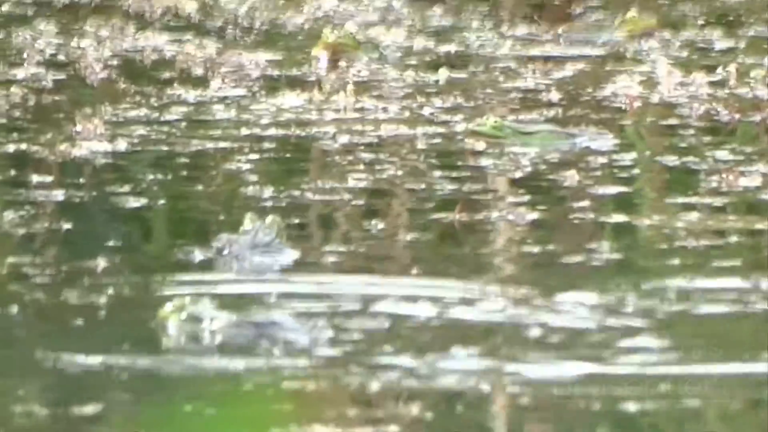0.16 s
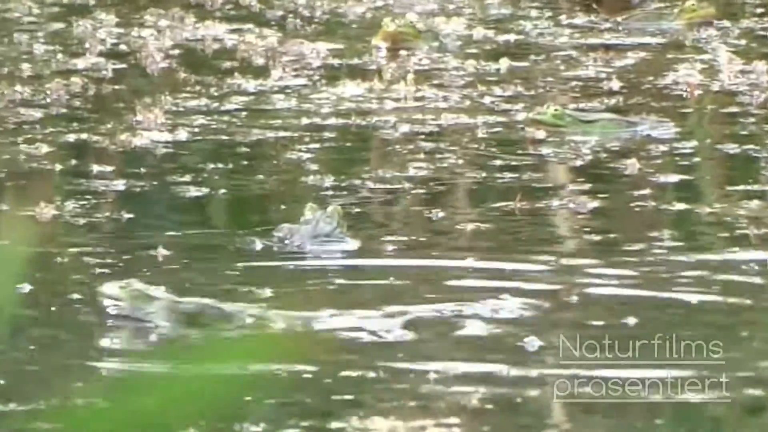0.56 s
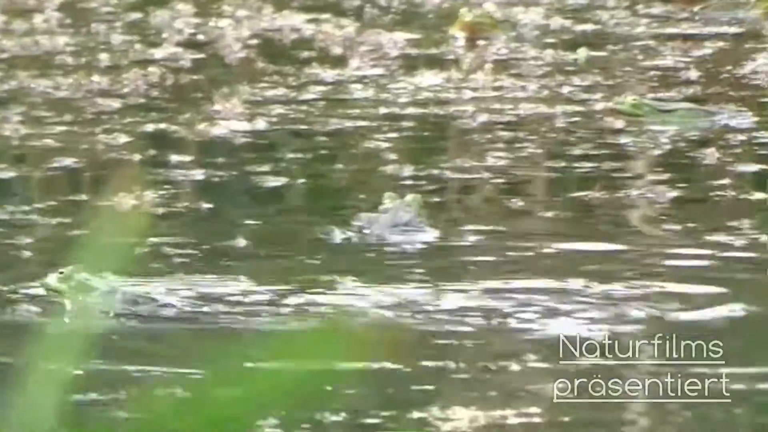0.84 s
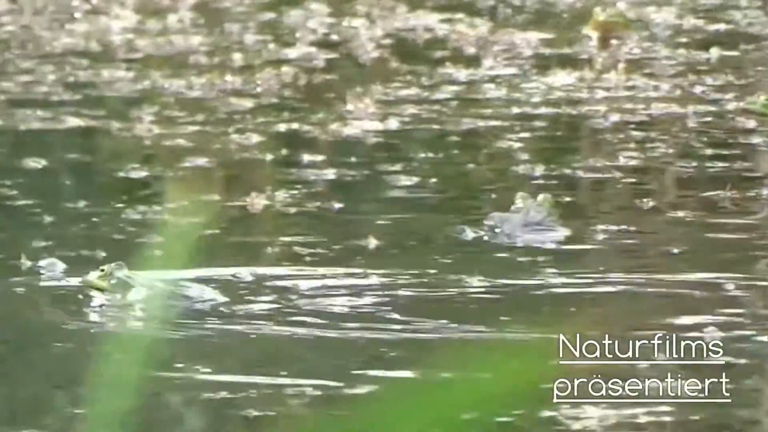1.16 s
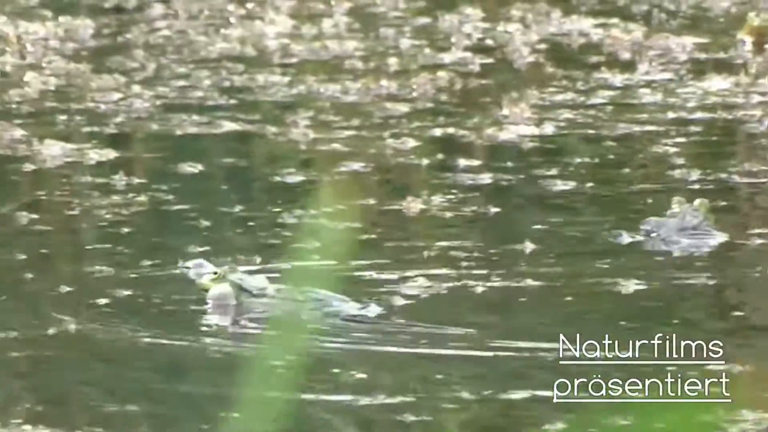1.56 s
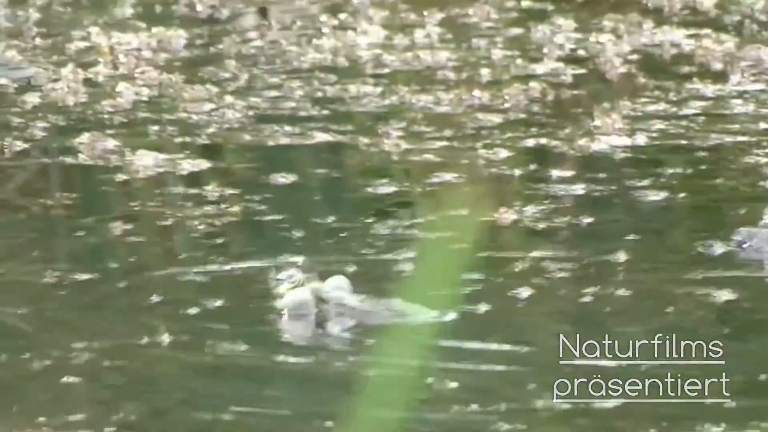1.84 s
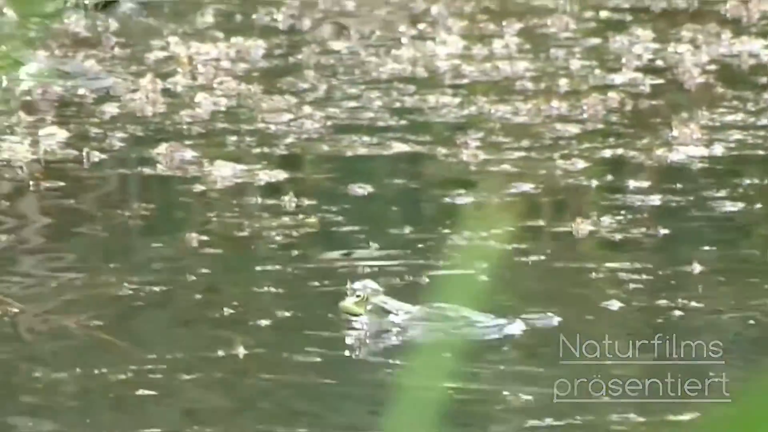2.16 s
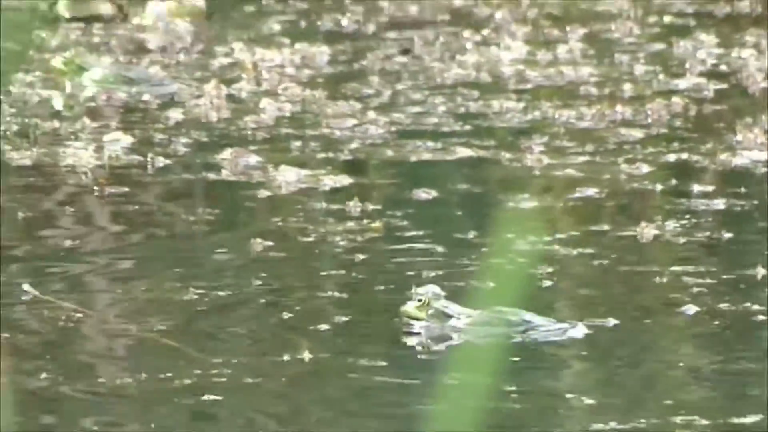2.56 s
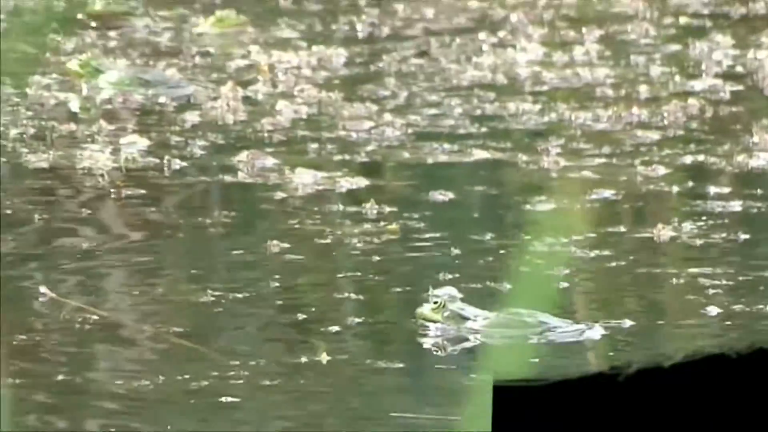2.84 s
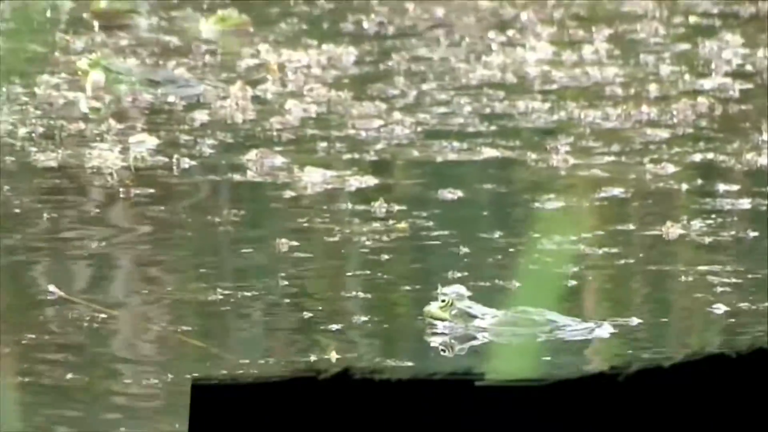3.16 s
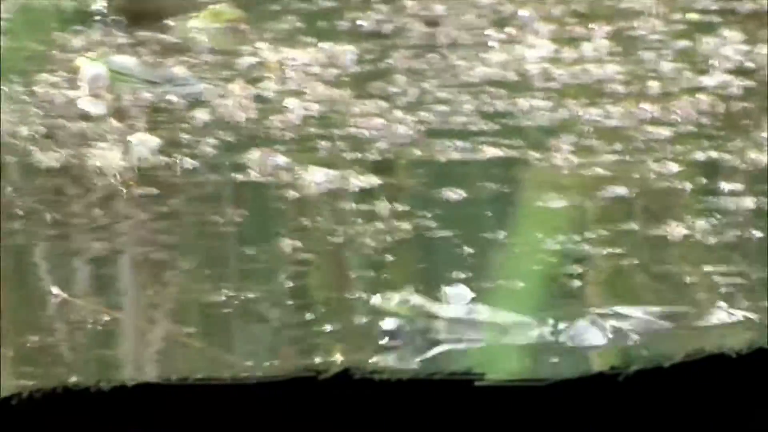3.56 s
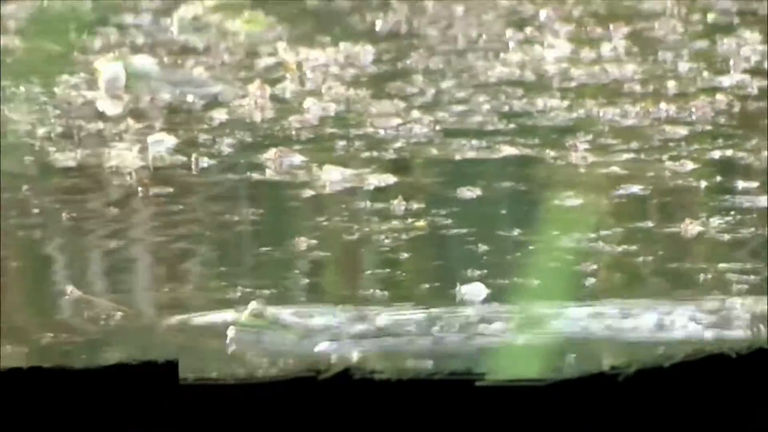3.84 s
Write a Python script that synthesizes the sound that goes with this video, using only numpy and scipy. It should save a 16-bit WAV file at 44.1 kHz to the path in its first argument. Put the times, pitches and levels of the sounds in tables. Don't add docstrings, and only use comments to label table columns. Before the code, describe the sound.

Frogs croak around a pond, after a quick fade-in. A dry, evenly knocking rattle runs 0.15-0.65 s, a swelling croak at 0.9, then grainy croaks at 1.7-2.6 with a brief rattle at 2.15. A pulsing laughing call grows from 3.0 to 3.65, another croak follows. Behind: faint trills, a buzz at 1.1, bird rasps at 1.7, 2.8 and 3.5, tiny whistles, clicks, airy hiss, low traffic hum.

```python
import sys
import numpy as np
from scipy import signal
from scipy.fft import rfft, irfft
from scipy.io import wavfile
from scipy.ndimage import uniform_filter1d

SR = 44100
rng = np.random.default_rng(int(sys.argv[2]) if len(sys.argv) > 2 else 0)


def gain_from_decibels(decibels):
    exponent = np.asarray(decibels, float) / 20
    return 10 ** exponent


def wrap_up_sound(samples):
    columns = np.atleast_2d(samples).T
    tamed = np.clip(columns, -1, 1)
    steps = np.round(tamed * 32767).astype(np.int16)
    wavfile.write(sys.argv[1], SR, steps)


N = 176400

# (start [s], length [s], peak place [0-1], peak level [dB])
CROAKS = [(0.129, 0.1, 0.07, -37), (1.683, 0.09, 0.97, -27), (2.821, 0.12, 0.88, -21),
          (3.429, 0.16, 0.75, -23.5), (3.285, 0.093, 0, -28), (2.36, 0.062, 1, -32.5)]
# (first sac pitch [Hz], last [Hz], first pulse gap [ms], last [ms], ring t60 [s])
CROAK_VOICES = [(1592, 1047, 5.1, 5.9, 0.06), (1346, 1260, 5, 6.5, 0.039), (1017, 1417, 5.1, 6.3, 0.02),
                (1380, 1274, 5.5, 7, 0.017), (1750, 1380, 12, 6.2, 0.024), (900, 1000, 5.5, 6, 0.014)]
# (time [s], peak level [dB])
EARLY_CROAKS = [
    [(0.8821, -31), (0.8873, -36.5), (0.8934, -32), (0.8999, -30), (0.9065, -29), (0.9151, -27),
     (0.9258, -28), (0.935, -24.5), (0.943, -26), (0.9521, -21.5), (0.9619, -24.5), (0.9697, -21.5),
     (0.9762, -21.5), (0.9828, -30), (0.9907, -29), (1.0008, -26.5), (1.0072, -33)],
    [(1.7761, -32), (1.7826, -30), (1.7892, -28), (1.7969, -24), (1.8055, -22), (1.8128, -22),
     (1.8204, -21.5), (1.8328, -20), (1.8433, -19.5), (1.8502, -20), (1.8562, -21.5), (1.8632, -24),
     (1.8771, -30), (1.8824, -27)],
    [(1.9458, -37), (1.9525, -33), (1.9599, -31), (1.9687, -30), (1.9781, -30), (1.9863, -34),
     (1.9955, -26.5), (2.0061, -29), (2.0156, -28.5), (2.0261, -24.5), (2.037, -24.5), (2.0475, -25.5),
     (2.0564, -25), (2.0655, -23.5), (2.0764, -22), (2.0883, -27), (2.0962, -23.5), (2.1057, -20),
     (2.1193, -25.5)],
]
# (time [s], peak level [dB])
LATE_KNOCKS = [
    [(2.4265, -35), (2.4317, -33), (2.4389, -31), (2.4457, -29), (2.452, -27.5), (2.458, -26),
     (2.4647, -30), (2.4748, -28), (2.4811, -29), (2.4871, -22), (2.4977, -22), (2.5073, -26.5),
     (2.5139, -22.5), (2.5274, -26), (2.5361, -29), (2.5462, -39), (2.5673, -33.5)],
    [(2.9512, -31), (2.9633, -28), (2.9688, -27), (2.977, -25.5), (2.9853, -23), (2.9952, -24),
     (3.0043, -22), (3.0119, -33), (3.0228, -26)],
    [(3.6764, -26), (3.6836, -23.5), (3.6925, -21.5), (3.7026, -22), (3.7117, -28), (3.7189, -22.5),
     (3.7257, -24), (3.7346, -22.5), (3.7452, -23.5), (3.7551, -24.5), (3.7647, -22), (3.7751, -23),
     (3.7879, -24), (3.7989, -24.5), (3.8085, -25), (3.8199, -29)],
]
# (first pitch [Hz], last pitch [Hz], ring t60 [s],
# throat level [dB])
SLOW_SACS = [(1750, 1520, 0.01, -10), (1220, 1240, 0.023, -12.5), (840, 1380, 0.016, -13),
             (1023, 1270, 0.016, -11), (1340, 1324, 0.023, -5), (2240, 2045, 0.013, -17)]
# (time [s], peak level [dB], sac pitch [Hz])
RATTLE = [(0.166, -33.5, 1790), (0.2065, -32, 1760), (0.2465, -28.5, 1770), (0.2865, -29, 1750),
          (0.33, -29, 1750), (0.364, -34.5, 1900), (0.3755, -29, 1770), (0.4162, -28, 1760),
          (0.452, -31, 1690), (0.494, -33, 1640), (0.5346, -27.5, 1440), (0.5781, -27.5, 1430),
          (0.6184, -35, 1380), (0.6277, -26.5, 1304), (2.1398, -24, 1540), (2.15, -19.5, 1470),
          (2.185, -21.5, 1733), (2.2016, -24.5, 1480), (2.2328, -22, 1540), (3.892, -39, 1490),
          (3.904, -31.5, 1360), (3.9328, -33.5, 1380), (3.9717, -30.5, 1440)]
# (time [s], level [dB])
LAUGH = [(3.0324, -32), (3.0744, -30.5), (3.1183, -28.5), (3.1597, -30), (3.2046, -27.5), (3.258, -28),
         (3.2999, -26.5), (3.3393, -25), (3.3787, -23), (3.4141, -21), (3.457, -21), (3.495, -21.5),
         (3.5304, -19.5), (3.5683, -21.5), (3.6082, -21), (3.6486, -22.5)]
# (time [s], level [dB])
LAUGH_TRAIL = [(3.1, -30), (3.6, -5.5)]
# (time [s], pitch [Hz])
LAUGH_SAC = [(3.0, 2000), (3.3, 1900), (3.55, 2130), (3.8, 2170)]
# (level [dB], level [dB])
LAUGH_LEAD = (-5, -7)
# (pitch [Hz], ring t60 [s])
THROAT = (561, 0.008)
# (start [s], length [s], level [dB], sac pitch [Hz], throb rate [1/s])
TRILLS = [(1.27, 0.33, -58, 3700, 90), (0.1, 0.57, -58.5, 3750, 55), (.42, 0.2, -55.5, 2490, 21.6),
          (0.715, 0.045, -52, 2600, 16), (2.42, 0.2, -63, 5150, 90), (2.04, 0.24, -59, 4400, 27.8),
          (2.35, .07, -53, 3650, 60), (.9, .1, -60, 4450, 70)]
# (start [s], length [s], level [dB], throb rate [1/s])
BUZZ = (1.12, 0.42, -49.5, 56.8)
# (pitch [Hz], width [Hz], level [dB])
BUZZ_BANDS = [(1190, 80, -5), (2030, 160, 0), (2330, 140, -2)]
CHORUS_SACS = [624.4, 801.5, 1278, 1900]
# (time [s], level [dB])
CHORUS_LEVEL = [(.5, -65), (1.5, -65.5), (2.0, -52), (4.0, -52)]
# (start [s], length [s], level [dB], left-right difference [dB])
RASPS = [(1.675, 0.28, -39, -4), (2.773, 0.31, -42, -3), (3.548, 0.2, -49, -2.5)]
# (first pitch [Hz], last pitch [Hz], width [Hz], first level [dB], last level [dB])
RASP_BANDS = [(4700, 4050, 300, 9, 0), (3750, 3400, 350, 0, 9), (2950, 2800, 350, -4, 2),
              (5500, 5100, 600, 1, -8), (7500, 6500, 1100, 4, -10)]
# (time [s], pitch [Hz])
SWOOP = [(1.1, 4450), (1.107, 8220), (1.122, 9880), (1.152, 8100), (1.167, 5700), (1.19, 4250),
         (1.222, 3770)]
# (start [s], length [s], first pitch [Hz], last pitch [Hz], level [dB])
CHIRPS = [(.88, 0.022, 8300, 7000, -68), (.94, 0.04, 9000, 7000, -69)]
# (start [s], length [s], first pitch [Hz], last pitch [Hz], level [dB])
GLIDES = [(.796, 0.04, 4200, 3100, -59), (1.045, 0.02, 5400, 6300, -63), (2.32, .02, 4750, 4650, -53),
          (2.34, .02, 4200, 4000, -53), (2.67, 0.042, 3650, 3000, -53), (3.441, 0.016, 3600, 5600, -58),
          (3.523, 0.012, 7200, 9900, -61), (3.555, .014, 9300, 7600, -63), (1.55, 0.13, 1190, 1260, -47.5),
          (2.745, 0.065, 1380, 1420, -47)]
# (time [s], level [dB])
TICKS = [(1.0223, -32), (1.945, -43), (2.132, -50)]
# (frequency [Hz], t60 [s])
POND = [(1000, 1), (8000, 0.33)]
# (frequency [Hz], density [dB per Hz])
AIR = [(300, -34.5), (420, -13.5), (1200, -10.5), (4100, -14), (4900, -26.5), (8500, -32), (10500, -45),
       (15500, -53.5)]
# (time [s], level [dB])
AIR_STIR = [(.7, -4.5), (1.1, 4), (3.0, 1.5), (3.4, 9), (3.75, 3.5)]
# (frequency [Hz], density [dB per Hz])
HUM = [(20, -9.5), (70, 6.5), (129, -1.5), (252, -12.5), (330, -31.5), (430, -54)]
# (time [s], level [dB])
TRAFFIC = [(.35, 4), (1.05, -5), (1.22, 3), (3.0, -1), (3.18, 4), (3.5, -3)]
# (frequency [Hz], correlation [0-1])
LIKENESS = [(30, 1), (130, .975), (790, 0.87), (10400, 0.8)]
# (time [s], level [dB])
FADE = [(.07, -33), (.1, -12.5), (.19, -0.5)]


def evened(x):
    return x / np.sqrt(np.mean(x ** 2) + 1e-20)


def curve(points, s):
    return np.interp(s, *np.transpose(points))


def spectrum_curve(points, hz):
    f, value = np.transpose(points)
    return np.interp(np.log(hz + 1), np.log(f + 1), value)


def add(mix, s, sound, pan_db=0):
    part = mix[:, round(s * SR):][:, :len(sound)]
    part += sound[:part.shape[1]] * gain_from_decibels(np.array([[0.5], [-0.5]]) * pan_db)


def resonate(x, hz, width):
    turn = np.exp(2j * np.pi * np.cumsum(hz * np.ones(len(x))) / SR)
    r = np.exp(-np.pi * width / SR)
    return 2 * (turn * signal.lfilter([1 - r], [1, -r], x / turn + 1e-18)).real


def knock(hz, t60, db, throat_db=-10, rise=0.00027, over=1.43, snap_db=-6):
    t = np.arange(1500) / SR

    def ring(f, decay):
        return gain_from_decibels(-60 * t / decay) * np.sin(2 * np.pi * f * t)

    x = ring(hz, t60) + gain_from_decibels(throat_db) * ring(*THROAT)
    x = x + gain_from_decibels(-18.5) * ring(hz * over, 0.9 * t60)
    x = x + gain_from_decibels(snap_db) * ring(1.09 * hz, 0.0037)
    x = (1 - np.exp(-t / rise)) * x
    return gain_from_decibels(db) * x / abs(x).max()


def swelling_croaks(out):
    rise_db, fall_db, uneven_db, jitter = -12, -8, 1.5, 0.08
    for (start, length, top, db), (hz0, hz1, gap0, gap1, t60) in zip(CROAKS, CROAK_VOICES):
        s = 0
        for level_luck, gap_luck, pitch_luck in rng.standard_normal((60, 3)):
            u = s / length
            if u < 1:
                swell_db = np.interp(u, [0, top, 1], [rise_db, 0, fall_db]) + uneven_db * level_luck
                hz = (hz0 + (hz1 - hz0) * u) * (1 + 0.02 * pitch_luck)
                add(out, start + s, knock(hz, t60, db + swell_db))
            s += (gap0 + (gap1 - gap0) * u) * (1 + jitter * gap_luck) / 1000


def slow_croaks(out):
    for knocks, (hz0, hz1, t60, throat_db) in zip(EARLY_CROAKS + LATE_KNOCKS, SLOW_SACS):
        for s, db in knocks:
            hz = np.interp(s, [knocks[0][0], knocks[-1][0]], [hz0, hz1])
            hz = hz * (1 + 0.017 * rng.standard_normal())
            add(out, s, knock(hz, t60, db, throat_db, snap_db=throat_db + 3.5), -0.4)


def rattle(out):
    t60, after_s, after_db = 0.015, 0.0145, -9
    for s, db, hz in RATTLE:
        dry_knock = knock(hz, t60, db, throat_db=-18.5, rise=0.0002, over=2.1, snap_db=1)
        add(out, s, dry_knock, -0.3)
        add(out, s + after_s, knock(hz, t60, db + after_db), -0.3)


def laugh(out):
    gap_s, lead_gap_s = 0.0088, 0.0093
    for s, db in LAUGH:
        sac_hz = curve(LAUGH_SAC, s)
        steps_db = (*LAUGH_LEAD, 0, 0, curve(LAUGH_TRAIL, s))
        for k, step_db in zip((-0.75, -2, 0, 1, 2), steps_db):
            gap = lead_gap_s if k < 0 else gap_s
            hz = sac_hz * (1 + 0.023 * rng.standard_normal())
            pulse = knock(hz, 0.022, db + step_db, throat_db=-17.5, rise=0.00035, over=1.17, snap_db=-14.5)
            add(out, s + k * gap, pulse, -1.2)


def near_frogs():
    out = np.zeros((2, N))
    for call in (swelling_croaks, slow_croaks, rattle, laugh):
        call(out)
    return out


def trills(out):
    pulse_hz, relative_width = 260, 0.067
    for start, length, db, hz, throb in TRILLS:
        luck, t = rng.standard_normal((2, SR)), np.arange(0, length, 1 / SR)
        wander = 1.5 * uniform_filter1d(luck[0, :len(t)], size=200)
        turns = np.cumsum(pulse_hz * (1 + wander)) / SR
        pulses = np.diff(turns // 1, prepend=0) + 0.051 * luck[1, :len(t)]
        drive = pulses * (0.05 + np.sin(np.pi * throb * t) ** 2)
        width = relative_width * hz
        voice = resonate(resonate(drive, hz, width), hz, 2 * width)
        add(out, start, gain_from_decibels(db) * evened(voice) * np.sin(np.pi * t / length) ** 0.067, -1.5)


def buzz(out):
    start, length, db, throb = BUZZ
    t = np.arange(0, length, 1 / SR)
    drive = rng.standard_normal(len(t)) * (0.18 + np.sin(np.pi * throb * (t + 0.0037)) ** 2)
    voice = 0
    for hz, width, band_db in BUZZ_BANDS:
        voice = voice + gain_from_decibels(band_db) * evened(resonate(resonate(drive, hz, width), hz, 3 * width))
    add(out, start, gain_from_decibels(db) * evened(voice) * np.sin(np.pi * t / length) ** 0.19, -1.5)


def chorus():
    knocks_per_s = 400
    size = gain_from_decibels(3.8 * np.clip(rng.exponential(1, N), 0, 2)) * (rng.random(N) < knocks_per_s / SR)
    who = rng.integers(0, len(CHORUS_SACS), N)
    side = gain_from_decibels(1.6 * rng.standard_normal(N))
    crowd = np.zeros((2, N))
    for k, hz in enumerate(CHORUS_SACS):
        impulses = size * (who == k) * np.array([side, 1 / side])
        crowd += signal.oaconvolve(impulses, knock(hz, 0.035, 0)[None], axes=1)[:, :N]
    return gain_from_decibels(curve(CHORUS_LEVEL, np.arange(N) / SR)) * evened(crowd)


def far_frogs():
    out = np.zeros((2, N))
    trills(out)
    buzz(out)
    return out + chorus()


def rasps(out):
    puff_hz, puff_decay = 128, 0.35
    for start, length, db, pan_db in RASPS:
        luck, t = rng.standard_normal((2, SR)), np.arange(0, length, 1 / SR)
        u = t / length
        wander = 2.4 * uniform_filter1d(luck[0, :len(t)], size=300)
        turns = np.cumsum(puff_hz * (1 + wander)) / SR
        puffs = (0.4 + np.exp(-(turns % 1) / puff_decay)) * luck[1, :len(t)]
        voice = 0
        for hz0, hz1, width, db0, db1 in RASP_BANDS:
            hz = hz0 + (hz1 - hz0) * u
            band = resonate(resonate(puffs, hz, width), hz, 2 * width)
            voice = voice + gain_from_decibels(db0 + (db1 - db0) * u) * evened(band)
        ends = np.minimum(1, np.minimum(t / 0.058, (length - t) / 0.092))
        add(out, start, gain_from_decibels(db) * evened(voice) * ends, pan_db)


def whistle(hz, db):
    u = np.linspace(0, 1, len(hz))
    drift = evened(uniform_filter1d(rng.standard_normal(SR), size=300))
    flutter = gain_from_decibels(2.0 * drift[:len(hz)])
    tone = np.sin(2 * np.pi * np.cumsum(hz) / SR)
    return np.sqrt(2) * gain_from_decibels(db) * flutter * np.sin(np.pi * u) ** 0.5 * tone


def birds():
    out = np.zeros((2, N))
    rasps(out)
    first, last = SWOOP[0][0], SWOOP[-1][0]
    add(out, first, whistle(curve(SWOOP, np.arange(first, last, 1 / SR)), -49.5), 3.0)
    for rows, bend in ((CHIRPS, 3.0), (GLIDES, 0.9)):
        for start, length, hz0, hz1, db in rows:
            u = np.linspace(0, 1, round(length * SR))
            add(out, start, whistle(hz0 + (hz1 - hz0) * u ** bend, db), -0.2)
    return out


def ticks():
    out, t = np.zeros((2, N)), np.arange(600) / SR
    for s, db in TICKS:
        burst = rng.standard_normal(len(t)) * gain_from_decibels(-60 * t / 0.011)
        burst = signal.lfilter(*signal.butter(2, [500, 5000], "band", fs=SR), burst)
        add(out, s, gain_from_decibels(db + 10) * burst / abs(burst).max(), 0.5)
    return out


def pond_echoes(x):
    taps = np.zeros((2, SR // 2))
    at = np.arange(200, SR // 2 - 20, 20) + rng.integers(0, 20, (2, (SR // 2 - 201) // 20))
    np.put_along_axis(taps, at, rng.choice([-1., 1.], at.shape), 1)
    taps = taps[0] + np.array([[0.2], [-0.2]]) * taps[1]
    hz, t, z = signal.stft(taps, SR, nperseg=256)
    decay = gain_from_decibels(-60 * t / spectrum_curve(POND, hz)[:, None])
    tail = signal.istft(z * decay, SR, nperseg=256)[1]
    return signal.fftconvolve(x, tail / np.linalg.norm(tail[0]), axes=1)[:, :N]


def hiss(spectrum, db, size, patchy_db):
    frames, hz = 4 * N // size + 5, np.fft.rfftfreq(size, 1 / SR)
    a, b, c, d, patches = rng.standard_normal((frames, len(hz), 5)).T
    patches = uniform_filter1d(patches, size=9, axis=0)
    patches = evened(uniform_filter1d(patches, size=12, axis=1))
    same = np.clip(spectrum_curve(LIKENESS, hz), -1, 1)[:, None]
    left = a + 1j * b
    right = same * left + np.sqrt(1 - same ** 2) * (c + 1j * d)
    z = np.array([left, right]) * gain_from_decibels(spectrum_curve(spectrum, hz)[:, None] + patchy_db * patches)
    noise = signal.istft(z, nperseg=size, noverlap=3 * size // 4)[1][:, :N]
    return gain_from_decibels(db) * evened(noise)


def air_and_traffic():
    t = np.arange(N) / SR
    air = hiss(AIR, -53.5, size=1024, patchy_db=2.5)
    treble_band = signal.butter(2, [4400, 10500], "band", fs=SR, output="sos")
    air = air + (gain_from_decibels(curve(AIR_STIR, t)) - 1) * signal.sosfilt(treble_band, air)
    hum = hiss(HUM, -60, size=4096, patchy_db=-2.0)
    return air + hum * gain_from_decibels(curve(TRAFFIC, t))


def scene():
    near, far, sky = near_frogs(), far_frogs(), birds()
    near = signal.sosfilt(signal.butter(4, 4300, fs=SR, output="sos"), near)
    wet = pond_echoes(gain_from_decibels(-15) * near + gain_from_decibels(-8.0) * far + gain_from_decibels(-4) * sky)
    floor = air_and_traffic()
    low_cut = signal.butter(4, 400, "high", fs=SR, output="sos")
    calls = signal.sosfilt(low_cut, near + far + wet) + sky + ticks()
    hz = np.fft.rfftfreq(N, 1 / SR)
    top_loss = gain_from_decibels(np.interp(hz, [10000, 11200], [0, -35]))
    return irfft(rfft(calls) * top_loss, N) + floor


def low_pass(x):
    return signal.sosfilt(signal.butter(12, 15700, fs=SR, output="sos"), x)


def record(dry):
    t = np.arange(N) / SR
    mix = dry * gain_from_decibels(curve(FADE, t)) * (t > FADE[0][0])
    return low_pass(mix)


dry = scene()
out = record(dry)
wrap_up_sound(out)
```